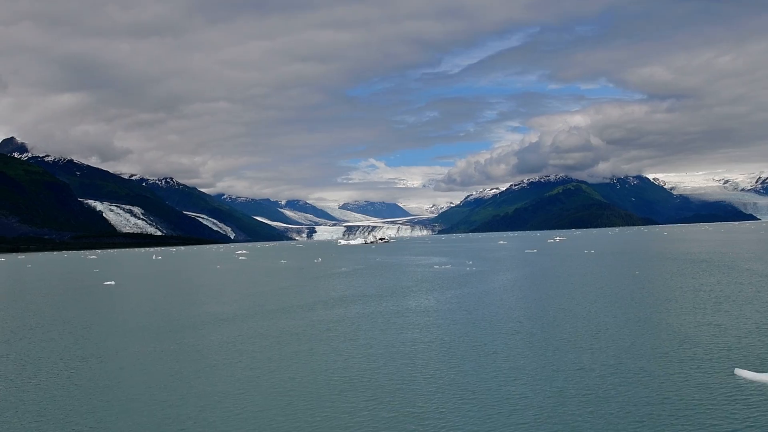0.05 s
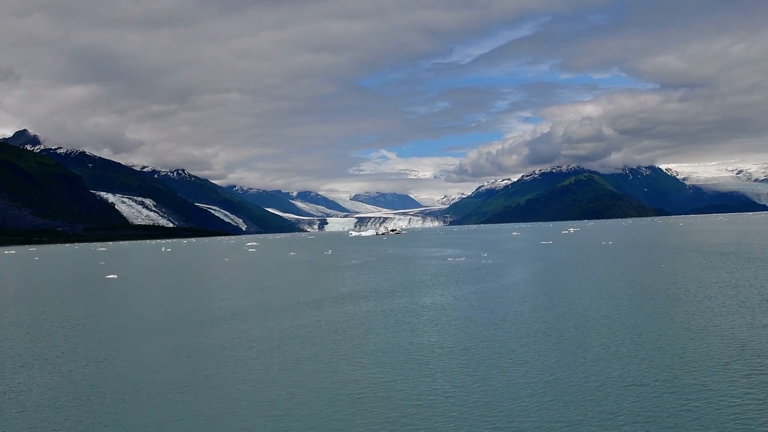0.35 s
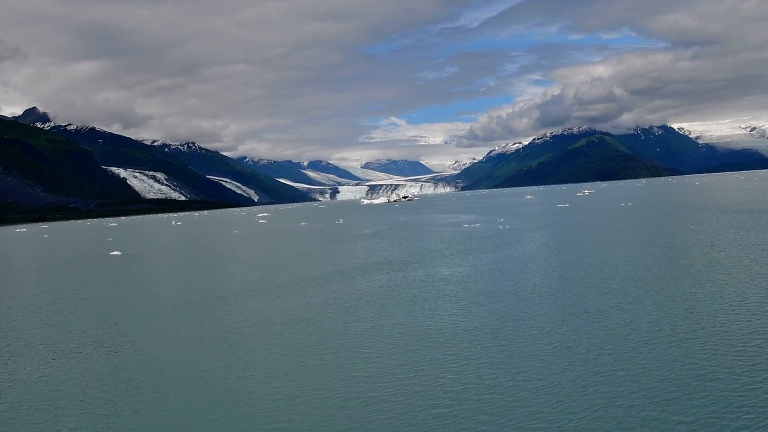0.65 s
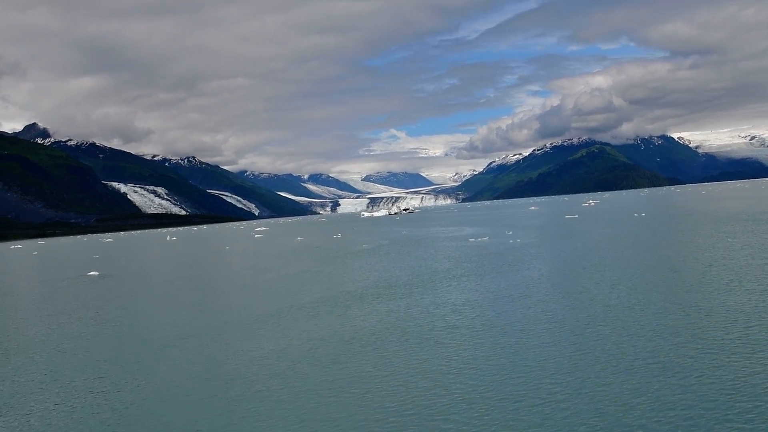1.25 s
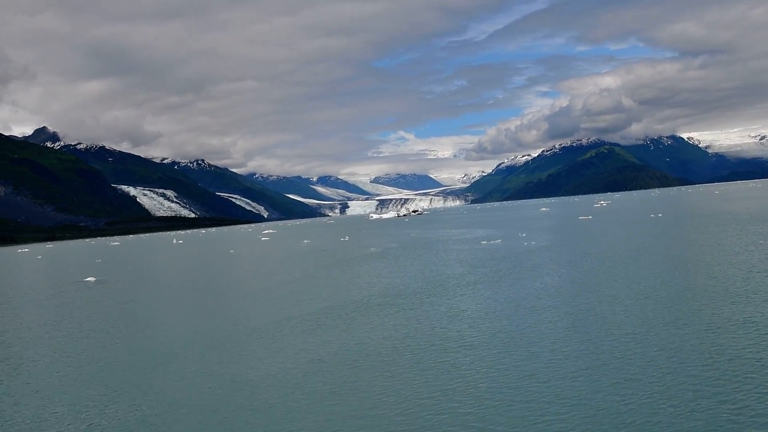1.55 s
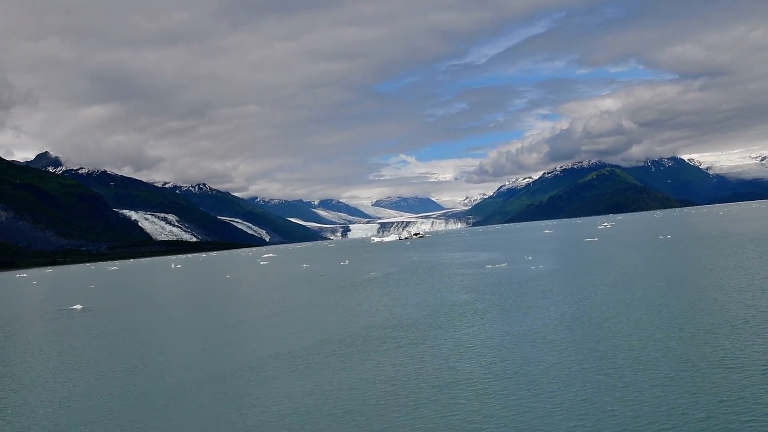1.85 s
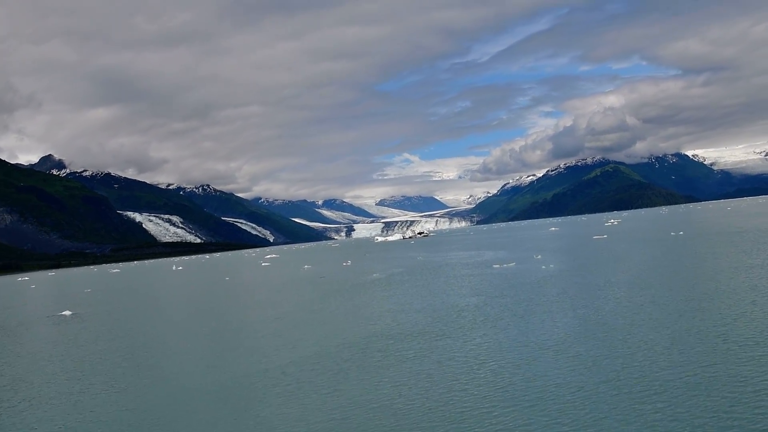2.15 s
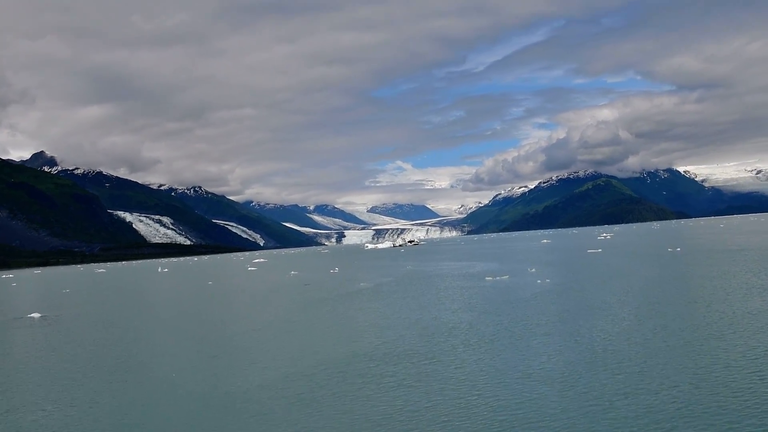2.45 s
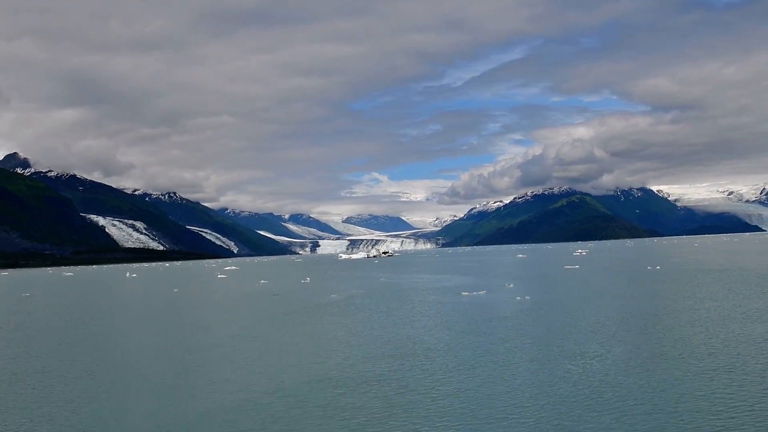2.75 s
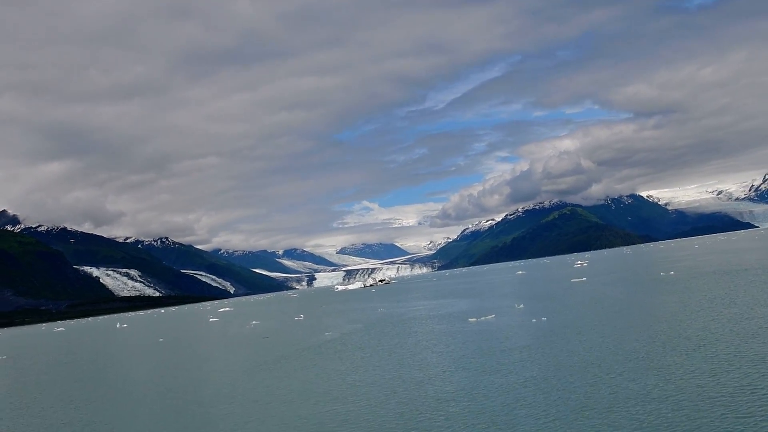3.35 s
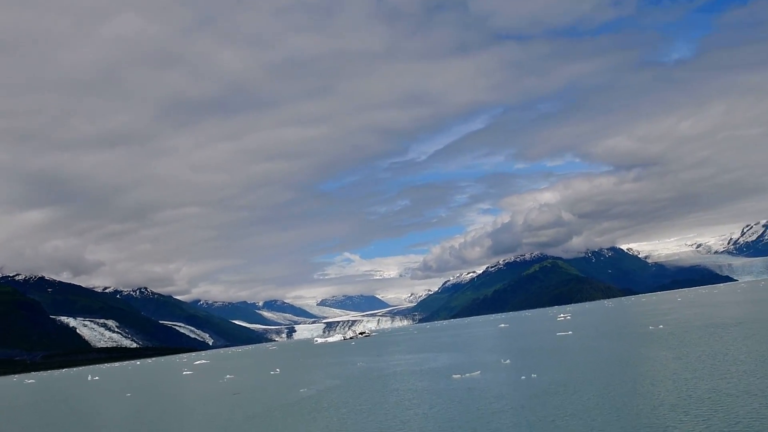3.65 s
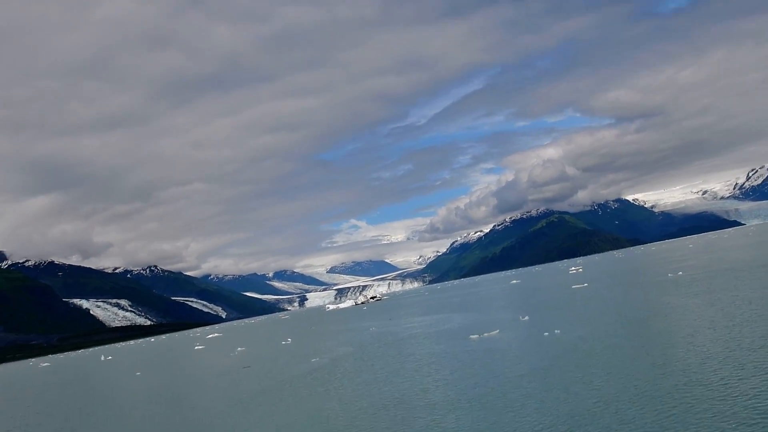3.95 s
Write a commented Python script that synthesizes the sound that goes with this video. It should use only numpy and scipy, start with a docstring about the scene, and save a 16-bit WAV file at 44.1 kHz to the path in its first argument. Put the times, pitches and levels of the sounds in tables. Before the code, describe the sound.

Strong wind buffets the microphone, crackling and rumbling over a faint hiss of water.

```python
"""Head wind on the deck of a boat under way buffets a camera's two microphone ports.
From the start the windward left port overloads, tearing into sharp alternating spikes over a shared
low rumble and the faint hiss of the wash. The sheltered right port overloads only in gusts and spits
four times, first at 0.7 s. It eases after 1.2 s and catches another strong gust near 2.8 s.
In the last half second the wind on the left turns choppy and drops."""
import sys
import numpy as np
from scipy import signal
from scipy.fft import rfft, irfft
from scipy.io import wavfile
from scipy.ndimage import uniform_filter1d, minimum_filter1d

SR = 44100
rng = np.random.default_rng(int(sys.argv[2]) if len(sys.argv) > 2 else 0)


def output_pcm(signal):
    """Save a mono or channel-first signal as 16-bit PCM at the path in sys.argv[1].

    Samples are clipped to [-1, 1] before scaling.
    """
    pcm = np.clip(np.atleast_2d(signal).T, -1, 1) * 32767
    wavfile.write(sys.argv[1], SR, np.round(pcm).astype(np.int16))


N = 176400
TIME = np.arange(N) / SR

# wind strength at each port, played about its mean: (time [s], level [dB])
LEFT_WIND = [(.05, -15.5), (.2, -14), (.4, -15.5), (2.7, -16), (2.9, -15.5), (3.42, -18), (3.59, -15),
             (3.665, -21.5), (3.72, -14.5), (3.775, -22), (3.855, -13.5), (3.875, -23.5), (3.935, -16.5),
             (3.955, -26), (3.995, -22)]
RIGHT_WIND = [(0.05, -15.5), (0.39, -15.5), (0.46, -20.5), (0.51, -27.5), (0.57, -13.0), (0.66, -18.0),
              (0.72, -24.5), (0.85, -13), (0.9, -31.0), (0.95, -27.5), (1.0, -15.5), (1.15, -15.5),
              (1.2, -25), (1.55, -26.5), (1.64, -21), (1.95, -19.5), (2.2, -20.5), (2.26, -26.5),
              (2.38, -17.5), (2.46, -20.5), (2.57, -19.0), (2.62, -27.0), (2.72, -27.0), (2.79, -15.5),
              (3.07, -17.5), (3.38, -23.5), (3.44, -28.5), (3.57, -21.0), (3.66, -29), (3.99, -25.5)]
# EQ on the buffeting at each port: (frequency [Hz], relative gain [dB])
LEFT_EQ = [(60, -12), (200, -7), (400, -6), (800, -2), (1500, 0.5), (3000, 1), (6000, 0.5), (9000, -0.5),
           (13000, 3.5), (15500, 4)]
RIGHT_EQ = [(60, -22), (200, -13), (400, -3), (800, -4), (1500, 0), (3000, 2), (6000, 1.5), (9000, 2.5),
            (16000, 7)]
# tone of the fine crackle in the fastest eddies: (frequency [Hz], relative level [dB])
CRACKLE_TONE = [(500, -31), (2000, 13.5), (5000, 4), (9000, 2), (12000, -2), (15500, 0.5)]
# tone of the rumble both ports share: (frequency [Hz], relative level [dB])
RUMBLE_TONE = [(15, -15), (30, -11), (50, -6.5), (85, -0.5), (130, 0.05), (210, 1), (330, -1.2), (420, -4),
               (700, -7.5), (1200, -15), (2500, -38.5), (6000, -52)]
# fader ride on the deepest rumble, played about its mean: (time [s], level [dB])
DEEP_RIDE = [(0, -22), (.75, -16.5), (1.25, -18), (2.2, -18.5), (2.75, -24.5), (3.25, -20), (4, -20.5)]
# EQ on the rumble at the windward port: (frequency [Hz], relative gain [dB])
WINDWARD_EQ = [(110, -0.5), (250, -1), (450, 1.4), (800, 1.2)]
# tone of the wash along the hull: (frequency [Hz], relative level [dB])
WASH_TONE = [(200, 17), (1500, 9), (3000, -19), (6000, -2.5), (10000, -26), (16000, -26)]
# spits at the right port: (time [s], level [dB])
SPITS = [(.674, -16), (1.374, -24), (2.802, -20), (3.605, -22)]


def from_db(db):
    """Decibels to gain."""
    return 10 ** (np.asarray(db) / 20)


def rms_one(x):
    """Scale to rms 1."""
    return x / np.sqrt(np.mean(x ** 2) + 1e-20)


def ride_db(rows):
    """A fader ride: a (time, level) table as dB about its mean at every sample."""
    db = np.interp(TIME, *np.transpose(rows))
    return db - db.mean()


def equalised(x, curve):
    """EQ by a (frequency, gain) table; rms 1."""
    hz, db = np.transpose(curve)
    bins = np.maximum(np.fft.rfftfreq(N, 1 / SR), 1)
    gain = from_db(np.interp(np.log(bins), np.log(hz), db))
    return rms_one(irfft(rfft(x) * gain, N))


def turbulence(corner_hz, steepness=2):
    """Noise that is flat up to a corner and rolls off by a power law above it; rms 1."""
    bins = np.fft.rfftfreq(N, 1 / SR)
    rolloff = np.sqrt(1 + (bins / corner_hz) ** (2 * steepness))
    return rms_one(irfft(rfft(rng.standard_normal(N)) / rolloff, N))


def limited(x, ceiling, hold_s):
    """Fast look-ahead limiter: the gain ducks smoothly around every peak above the ceiling."""
    size = max(int(hold_s * SR), 2) | 1
    gain = minimum_filter1d(np.minimum(1, ceiling / (abs(x) + 1e-9)), size)
    return x * uniform_filter1d(gain, size)


def buffeting(wind, eq, eddy_hz, steepness, flutter_db, flicker_db, speed_follows, force_follows,
              drive, level_db, ceiling, crackle_db, crackle_follows, low_cut_hz=1350):
    """Stronger wind brings faster, harder eddies, which saturate the diaphragm behind a port."""
    gust_db = ride_db(wind) + flutter_db * turbulence(40) + flicker_db * turbulence(300)
    travelled = np.cumsum(from_db(speed_follows * gust_db))   # gusts varispeed the eddies
    eddies = np.interp(travelled % N, np.arange(N), turbulence(eddy_hz, steepness))
    diaphragm = np.tanh(drive * from_db(force_follows * gust_db) * eddies)
    # the wind filter's low cut turns each swing of the diaphragm into a spike
    spikes = signal.lfilter(*signal.butter(1, low_cut_hz, "high", fs=SR), diaphragm)
    spikes = limited(from_db(level_db) * equalised(spikes, eq), ceiling, hold_s=0.00044)
    return spikes + from_db(crackle_db) * crackle(spikes, crackle_follows * gust_db)


def crackle(spikes, gust_db, sputter_db=2.5, sputter_hz=180):
    """The fastest eddies put a fine crackle on the spikes, in uneven bursts."""
    grit = rng.standard_normal(N) * spikes ** 2
    bursts = from_db(gust_db + sputter_db * turbulence(sputter_hz))
    return equalised(grit * bursts, CRACKLE_TONE)


def rumble(level_db=-14, flutter_db=0.33, deep_hz=140, windward_lag_s=.00005):
    """Large slow eddies press on both ports, a little later and brighter on the left."""
    pressure = equalised(rng.standard_normal(N), RUMBLE_TONE)
    pressure *= from_db(flutter_db * turbulence(6.9))
    deep = signal.sosfiltfilt(signal.butter(2, deep_hz, fs=SR, output="sos"), pressure)
    pressure += deep * (from_db(ride_db(DEEP_RIDE)) - 1)   # the bottom end swells and ebbs
    right = rms_one(limited(pressure, ceiling=1.85, hold_s=0.0059))
    left = equalised(np.interp(TIME - windward_lag_s, TIME, right), WINDWARD_EQ)
    return from_db(level_db) * np.array([left, right])


def wash(level_db=-48):
    """Water running along the hull lays down a smooth, wide bed of hiss."""
    hiss = [equalised(noise, WASH_TONE) for noise in rng.standard_normal((2, N))]
    return from_db(level_db) * np.array(hiss)


def spits(half_width_s=.0018):
    """An eddy overloads the right port for a few milliseconds: one short spit of crackle."""
    envelope = np.zeros(N)
    for time_s, level_db in SPITS:
        offset = (TIME - time_s) / half_width_s
        envelope += from_db(level_db) * np.exp(-np.minimum(offset ** 2, 50))
    return envelope * equalised(rng.standard_normal(N), CRACKLE_TONE)


def scene(crosstalk_db=-5, crosstalk_s=0.00024):
    """The mix: two buffeted ports up front, the shared rumble and the wash underneath."""
    left = buffeting(LEFT_WIND, LEFT_EQ, eddy_hz=705, steepness=1.741,
                     flutter_db=1.12, flicker_db=0.88, speed_follows=.68, force_follows=.02,
                     drive=1.85, level_db=-8.0, ceiling=0.69, crackle_db=-26, crackle_follows=1.6)
    right = buffeting(RIGHT_WIND, RIGHT_EQ, eddy_hz=544, steepness=2.18,
                      flutter_db=2.5, flicker_db=1.85, speed_follows=.45, force_follows=0.72,
                      drive=0.58, level_db=-19.0, ceiling=0.66, crackle_db=-43, crackle_follows=.5)
    # the right port's buffeting bleeds into the left, weaker and later
    crosstalk = from_db(crosstalk_db) * np.interp(TIME - crosstalk_s, TIME, right)
    return np.array([left + crosstalk, right + spits()]) + rumble() + wash()


def record(dry, start_s=.048, cutoff_hz=15900):
    """Master chain: peaks held near full scale, a hard cut in from silence and a steep high cut."""
    held = limited(dry, ceiling=1.0, hold_s=0.00026) * (TIME >= start_s)
    high_cut = signal.ellip(12, .1, 70, cutoff_hz, fs=SR, output="sos")
    return signal.sosfilt(high_cut, held)


dry = scene()
out = record(dry)
output_pcm(out)
```